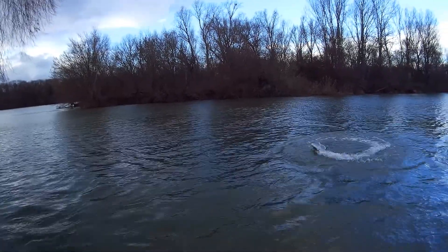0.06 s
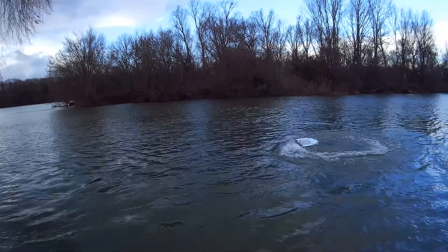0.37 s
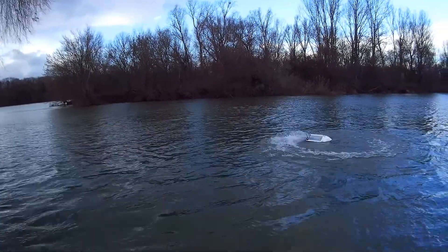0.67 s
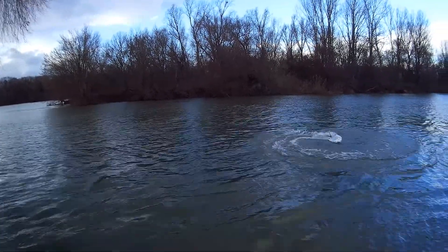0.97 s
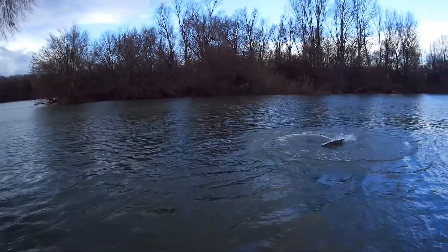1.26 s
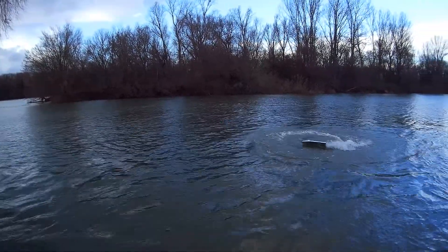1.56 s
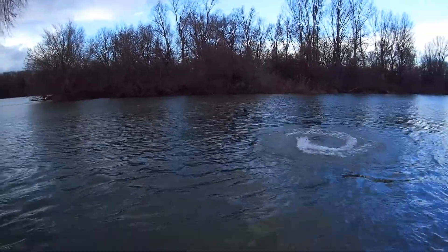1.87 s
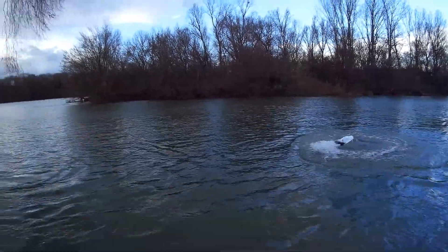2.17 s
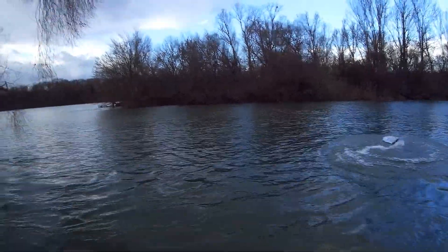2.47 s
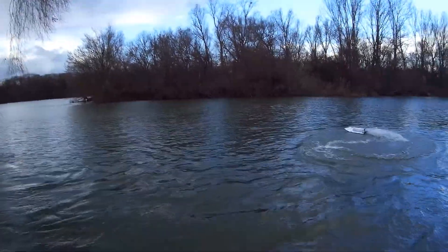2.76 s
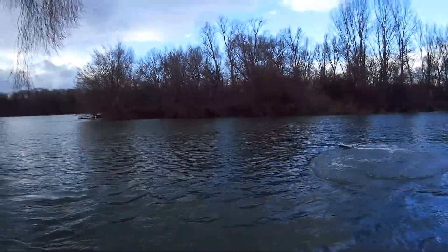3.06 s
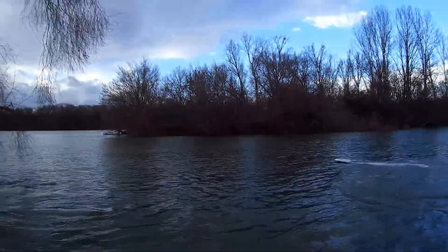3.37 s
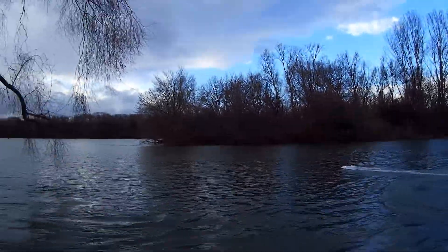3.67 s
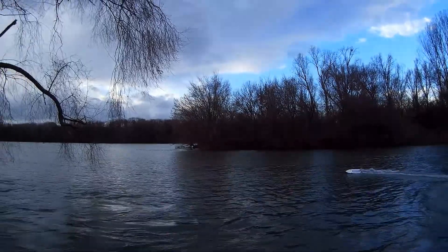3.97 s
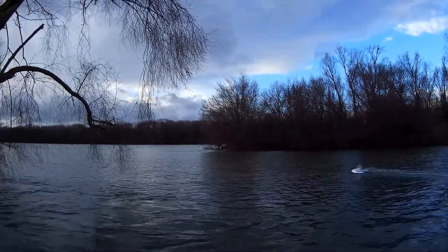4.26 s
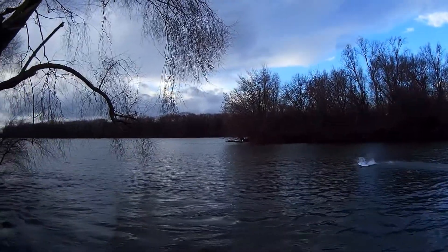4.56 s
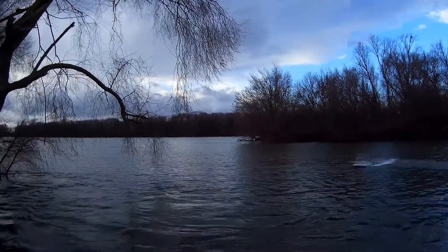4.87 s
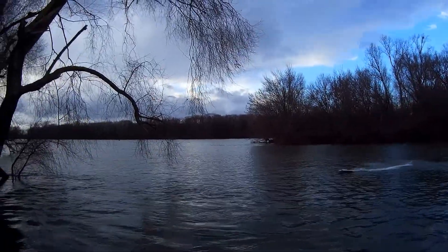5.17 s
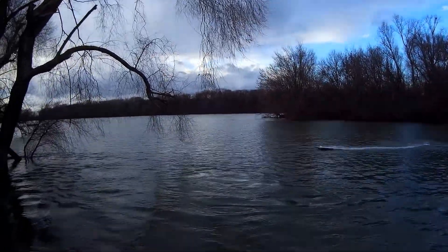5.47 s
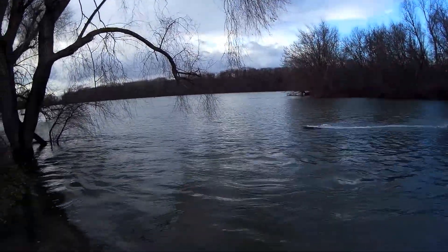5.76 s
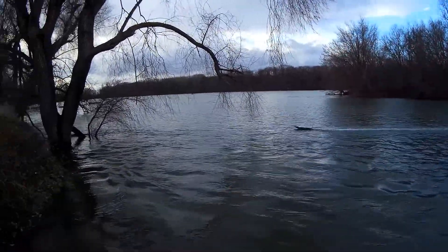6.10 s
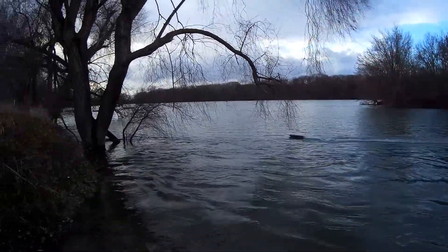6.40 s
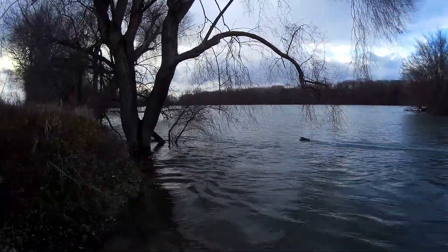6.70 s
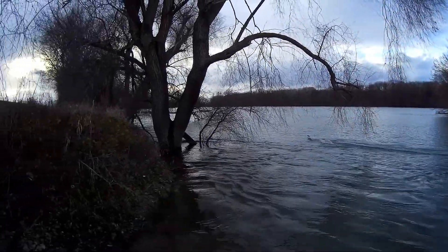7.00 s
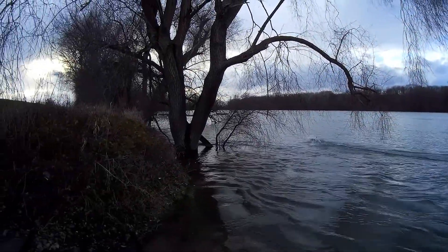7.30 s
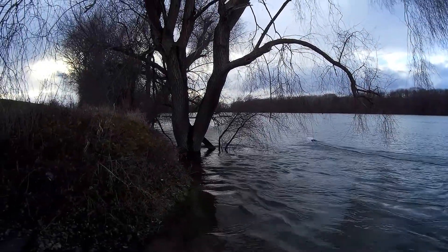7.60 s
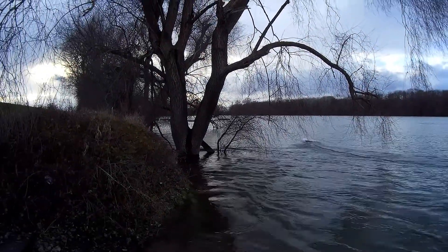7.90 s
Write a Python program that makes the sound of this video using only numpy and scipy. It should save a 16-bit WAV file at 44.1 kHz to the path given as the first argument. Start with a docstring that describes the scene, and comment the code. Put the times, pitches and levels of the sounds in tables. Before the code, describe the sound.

Close, uneven steps jolt the microphone with knocks and small clicks over soft wind, water and a distant model boat's thin whine.

```python
"""On a riverbank, heavy steps shake a body-worn camera: each one thuds and jolts its case into a knock.
Small clicks and rubbing cloth fall between the steps, and a few jolts set a metal part ringing.
Far out on the water a model boat's motor whines thinly while its propeller churns and throws spray.
Under it all lie a faint wash of wind and water and the microphone's hiss."""
import sys
import numpy as np
from scipy import signal
from scipy.fft import rfft, irfft, next_fast_len
from scipy.io import wavfile
from scipy.ndimage import uniform_filter1d

SR = 44100
rng = np.random.default_rng(int(sys.argv[2]) if len(sys.argv) > 2 else 0)


def waveform_to_disk(signal):
    """Save audio, clipped to [-1, 1], as 16-bit WAV at the path in sys.argv[1]."""
    frames = np.transpose(np.atleast_2d(signal))
    scaled = np.clip(frames, -1, 1) * 32767
    samples = np.round(scaled).astype(np.int16)
    wavfile.write(sys.argv[1], SR, samples)


N = 350222
TIME = np.arange(N) / SR

# jolts of the camera's case: start_s, thud_db, knock_db, clack_db, knock_pitch_hz, clack_pitch_hz
JOLTS = [(0.244, -57, -59.5, -73, 410, 1620), (0.292, -71, -56, -58, 438, 1460),
         (0.594, -51, -49.5, -51.5, 463, 1515), (1.816, -50.5, -49, -53.5, 550, 1560),
         (1.857, -60, -50, -57, 533, 1600), (1.89, -54, -36.5, -42.5, 396, 1720),
         (1.961, -23.5, -33, -35.5, 544, 1590), (2.073, -30.5, -17, -25.5, 512, 1770),
         (2.337, -43.5, -50.5, -71, 326, 1430), (2.414, -44.5, -45, -58, 634, 1440),
         (2.602, -41, -38, -49.5, 480, 1540), (2.738, -38, -40, -53, 473, 1170),
         (2.848, -43, -48, -64, 350, 1390), (3.061, -43, -36.5, -46.5, 610, 1250),
         (3.099, -34, -32, -32.5, 392, 1510), (3.122, -30.5, -16, -19.5, 476, 1390),
         (3.163, -52, -32.5, -47, 416, 1600), (3.439, -40, -41, -72, 345, 1430),
         (3.768, -55, -52, -85, 450, 1594), (3.801, -42, -48.5, -62, 524, 1570),
         (4.095, -37, -40, -47.5, 310, 1410), (4.227, -45, -55, -60, 474, 1270),
         (4.421, -32.5, -57, -61.5, 333, 1580), (4.437, -24, -21, -22, 620, 1500),
         (4.59, -39.5, -50, -56, 350, 1760), (4.918, -39.5, -45.5, -65, 313, 1225),
         (5.227, -47.5, -41.5, -46, 610, 1600), (5.466, -40, -65, -79.5, 307, 1420),
         (5.511, -34.5, -45, -58.5, 330, 1480), (5.615, -27.5, -16, -21.5, 444, 1380),
         (6.894, -68.5, -61.5, -57, 662, 1391), (7.1, -64, -66, -58, 493, 1427),
         (7.902, -38, -34, -36.5, 344, 1856)]
# tone of both the boat's mist and the microphone's hiss: pitch_hz, relative_db
HISS_TONE = [(1000, 8), (5000, -1.5), (8000, -3), (14000, -5.5), (15100, -8.5), (16000, -22)]


def case_knocks(jolts, thud_rise_s=0.0034, contact_s=0.0024, rattle_s=0.014, crack_s=0.0015):
    """Each jolt rings the camera's case in four parts, low to high: thud, knock, clack and tick."""
    # the notes the case rings at: pitch_hz, relative_db, ring_s
    case_notes = [(72, 0, 0.15), (104.3, 4.5, 0.15), (142.2, -5, 0.25), (221.5, -7, 0.2),
                  (316.3, -11, 0.042), (344.0, -9.5, 0.073), (400.2, 3.5, 0.021), (444.0, -25.5, 0.16),
                  (506, 6, 0.018), (612, -4, 0.035), (764.7, -7.5, 0.033), (976, -19.5, 0.056),
                  (1086, -6.5, 0.07), (1433, 0.4, 0.037), (1440, -4, 0.019), (1618, -1, 0.026),
                  (1953, 2.5, 0.022), (1875, -29.5, 0.26), (2135, -1.5, 0.02), (2474, -12, 0.02),
                  (2820, -20.5, 0.022), (3190, -23, 0.03), (4065, -26, 0.022), (4670, -37.5, 0.013),
                  (5900, -34.5, 0.014), (6070, -26, 0.015)]
    # the ranges of thud, knock, clack and tick: low_hz, high_hz
    ranges = [(66, 250), (260, 1300), (880, 2540), (2400, 6000)]
    out, t = np.zeros(N), np.arange(SR // 4) / SR
    hz = np.array(case_notes)[:, 0]
    part_of_note = np.searchsorted([250, 1000, 2400], hz)
    blow = np.sqrt(0.03 * SR)  # levels count as if each part lasted 30 ms
    for start_s, thud_db, knock_db, clack_db, knock_hz, clack_hz in jolts:
        tick_db = clack_db - 20.5
        levels_db = thud_db, knock_db, clack_db, tick_db
        notes = np.array(case_notes)
        notes[:, 0] *= 1 + 0.004 * rng.standard_normal(len(hz))
        # where the case is pushed decides which notes stand out
        for centre_hz, boost_db in (knock_hz, 7), (clack_hz, 4):
            notes[:, 1] += boost_db * np.exp(-(np.log2(hz / centre_hz) / 0.25) ** 2)
        ring = fading_notes(notes, t)
        # a heavy step is one clean blow; a light touch chatters
        rattle = np.interp(max(levels_db), [-55, -22], [0.88, 0.16])
        chatter = rng.standard_normal(len(t)) * np.exp(-t / rattle_s)
        push = rattle * chatter / np.linalg.norm(chatter)
        push[0] += 1
        for k, level_db in enumerate(levels_db):
            part = ring[part_of_note == k].sum(0)
            if k == 0:  # soft ground takes the weight too slowly to chatter
                part = part * fade_in(t, thud_rise_s)
            else:  # the plastic closes fast
                part = signal.fftconvolve(part * fade_in(t, contact_s), push)[:len(t)]
            part = band(part, *ranges[k])
            add(out, start_s, part * undb(level_db) * blow / np.linalg.norm(part))
        # a brief crack, stronger on hard blows
        hardness = np.interp(knock_db, [-30, -16], [0.15, 1])
        crack_shape = np.exp(-((t - crack_s) / (crack_s / 2)) ** 2)
        crack = band(rng.standard_normal(len(t)) * crack_shape, *ranges[-1])
        add(out, start_s, crack * hardness * undb(tick_db - 8) * blow / np.linalg.norm(crack))
    return out


def faint_taps(movement, count=22, knock_hz=419, clack_hz=1500):
    """Extra jolts at random times, as strong as the walker's movement at that moment."""
    taps = []
    for when, pitch in rng.random((count, 2)):
        db = 20 * np.log10(movement[int(when * N)])
        taps.append((when * N / SR, db + 6, db + 4, db - 6, knock_hz * 2 ** (pitch - 0.5), clack_hz))
    return taps


def metal_clinks(rise_s=0.0053):
    """A small metal part rings on after the jolts that reach it."""
    # blows on the part: start_s, strength_db
    blows = [(2.738, -47), (2.803, -57), (4.097, -42), (4.437, -19)]
    # the notes it rings at: pitch_hz, relative_db, ring_s
    metal_notes = [(641, 13, 0.031), (917, -7, 0.13), (1091, 3, 0.086), (1540, 10.5, 0.04),
                   (1620, -22, 0.18), (1814, -5, 0.36), (1916, -18, 0.47), (2480, -31.5, .35),
                   (2720, -7.5, 0.073), (3550, -26, 0.16)]
    out, t = np.zeros(N), np.arange(SR // 2) / SR
    ring = fading_notes(metal_notes, t).sum(0) * fade_in(t, rise_s)
    for start_s, strength_db in blows:
        add(out, start_s, undb(strength_db) * ring)
    return out


def catch_clicks(rise_s=0.00091, fade_s=0.006, spread=1.35):
    """The catch on the camera's mount snaps: a bright burst that dies at once."""
    # snaps of the catch: start_s, pitch_hz, level_db
    snaps = [(2.612, 5600, -58), (3.163, 3590, -51), (4.096, 2870, -49), (4.438, 4700, -43),
             (5.227, 2900, -58), (5.617, 4200, -39.5), (7.902, 3300, -44)]
    out, t = np.zeros(N), np.arange(SR // 20) / SR
    shape = fade_in(t, rise_s) * np.exp(-t / fade_s)
    for start_s, pitch_hz, level_db in snaps:
        burst = band(rng.standard_normal(len(t)), pitch_hz / spread, pitch_hz * spread)
        add(out, start_s, burst / burst.std() * undb(level_db) * shape)
    return out


def walker_movement(still_db=-74):
    """How strongly the walker moves: a swell with each shift of weight."""
    # shifts of weight: peak_s, length_s, level_db
    shifts = [(0.7, 0.85, -65), (1.95, 0.17, -49), (2.15, 0.26, -58.5), (2.68, 0.52, -59),
              (3.47, 0.098, -63), (4.14, 0.5, -58), (4.85, 0.56, -67), (5.54, 0.16, -65),
              (6.91, 0.024, -57.5), (7.07, 0.19, -66.5)]
    return np.hypot(undb(still_db), swells(shifts))


def body_rumble(movement, still_db=-62.5, settle_s=0.092, shudder_hz=(68, 131)):
    """The walker's body rumbles as it moves and shudders after each thud."""
    # tone of the rumble: pitch_hz, relative_db
    rumble_tone = [(25, -14.5), (38, -0.5), (52, -11.5), (72, -0.5), (105, -4.5), (180, -15), (330, -15.5),
                   (650, -20), (1000, -30.5)]
    strength = np.hypot(undb(still_db), movement * undb(3))
    rumble = noise(rumble_tone) * strength * undb(3 * wander(7.5))
    power, t = np.zeros(N), np.arange(SR) / SR
    for start_s, thud_db, *_ in JOLTS:
        add(power, start_s, (undb(thud_db - 13) * np.exp(-t / settle_s)) ** 2)
    shudder = band(rng.standard_normal(N), *shudder_hz)
    return rumble + shudder / shudder.std() * np.sqrt(power)


def cloth_rub(movement, flicker_db=4):
    """Clothing catches and slips on the mount as the walker moves."""
    # tone of the rubbing: pitch_hz, relative_db
    rub_tone = [(200, -9), (500, -5.5), (850, -4.5), (1080, 1), (1220, -6.5), (1450, 2), (1650, -7),
                (1950, 3), (2250, -10.5), (2550, -34), (3000, -13.5), (6000, -29)]
    return noise(rub_tone) * movement * undb(flicker_db * wander(45))


def brushes_and_rings(spread=1.1):
    """Cloth brushes on the mount, and the camera's case rings briefly near 670 Hz after two jolts."""
    # cloth brushes and the two low rings of the case: peak_s, length_s, pitch_hz, level_db
    bursts = [(1.924, 0.093, 1880, -54), (2.054, 0.21, 5550, -61.5), (2.416, 0.0093, 696, -40),
              (2.466, 0.047, 1870, -53.5), (3.064, 0.017, 650, -36), (4.835, 0.029, 1836, -57),
              (7.102, 0.033, 3987, -64.5)]
    out = np.zeros(N)
    for peak_s, length_s, pitch_hz, level_db in bursts:
        t = np.arange(-2 * length_s, 2 * length_s, 1 / SR)
        burst = band(rng.standard_normal(len(t)), pitch_hz / spread, pitch_hz * spread)
        shape = np.exp(-(2 * t / length_s) ** 2)
        add(out, peak_s + t[0], burst / burst.std() * undb(level_db) * shape)
    return out


def model_boat(steer_s=0.16):
    """In tight turns the propeller draws air, so the motor speeds up and the water churns louder."""
    # tight turns: start_s, end_s, extra_churn_db
    turns = [(-0.3, 2.9, 6.5), (4.08, 4.4, 14), (6.898, 8.3, 11)]
    turning, churn_db = np.zeros(N), np.zeros(N)
    for start_s, end_s, extra_churn_db in turns:
        inside_s = np.minimum(TIME - start_s, end_s - TIME)
        turn = np.clip(inside_s / steer_s + 0.5, 0, 1)
        turning += turn
        churn_db += turn * extra_churn_db
    return motor_whine(turning) + boat_wake(churn_db)


def motor_whine(turning, straight_hz=438, turning_hz=459, wobble=0.0077):
    """The motor sings at two and three times its spin rate, wavering with the waves."""
    # loudness as the boat's heading and distance change: time_s, relative_db
    loudness = [(0, -73), (2.6, -77), (3.4, -71.5), (5.3, -64), (6.7, -71.5), (7.3, -74.5), (7.8, -64.5)]
    spin_hz = straight_hz + (turning_hz - straight_hz) * turning
    angle = 2 * np.pi * np.cumsum(spin_hz * (1 + wobble * wander(44))) / SR
    lower = undb(-4 + 3.5 * wander(14)) * np.sin(2 * angle)
    upper = undb(-2 + 3.5 * wander(12)) * np.sin(3 * angle)
    return (lower + upper) * undb(curve(loudness))


def boat_wake(churn_db):
    """The propeller churns the water, the hull splashes, and the wake throws spray and fine mist."""
    # loudness of the wake: time_s, relative_db
    loudness = [(0.0, -70), (0.6, -70), (0.79, -69.5), (1.17, -75), (1.46, -72.5), (1.88, -69.5),
                (2.03, -63.5), (3.65, -70.5), (4.58, -65.5), (4.75, -71.5), (5.2, -73.5), (5.57, -66.5),
                (5.82, -71), (6.92, -73), (7.41, -77.5), (7.94, -84)]
    # splashes from the hull: peak_s, length_s, level_db
    splashes = [(0.63, 0.15, -61.5), (0.88, 0.43, -63), (2.8, 0.12, -56), (4.65, 0.14, -66.5),
                (5.76, 0.1, -66)]
    # tone of the churning: pitch_hz, relative_db
    churn_tone = [(900, -33.5), (1230, -25), (1330, -4), (1395, 5.5), (1470, -7), (1650, -19.5),
                  (2300, -44.5)]
    # tone of the spray: pitch_hz, relative_db
    spray_tone = [(1800, -27), (2450, -3.5), (2950, -18.5), (3350, 4), (3700, -15.5), (4150, 0), (4450, -6),
                  (4800, -17.5), (6000, -20.5), (8000, -50)]
    wake = undb(curve(loudness) + 2)
    thrown = np.hypot(wake, swells(splashes))  # all the water in the air
    churn = noise(churn_tone) * np.sqrt(wake * thrown) * undb(churn_db - 1.5 + 2.5 * wander(30))
    spray = noise(spray_tone) * thrown * undb(1.2 * wander(22))
    mist = noise(HISS_TONE) * wake * undb(-3 + 2.2 * wander(9))
    return churn + spray + mist


def river(level_db=-58.5):
    """A low wash of wind and water, swelling gently."""
    # tone of the wash: pitch_hz, relative_db
    wash_tone = [(20, -0.5), (37, 9), (52, -5), (70, -9), (120, -9.5), (250, -11.5), (500, -20), (800, -20),
                 (1080, -19), (1200, -26.5), (2500, -29), (3000, -31.5), (6000, -47.5)]
    return noise(wash_tone) * undb(level_db + 0.96 * wander(2) + 0.72 * wander(15))


def microphone_hiss(level_db=-73):
    """The microphone's own steady hiss."""
    return noise(HISS_TONE) * undb(level_db)


def undb(db):
    """Turn decibels into a number to multiply by."""
    return 10 ** (np.asarray(db) / 20)


def curve(points):
    """Join (time, value) points with straight lines."""
    return np.interp(TIME, *np.transpose(points))


def swells(rows):
    """Combine bell-shaped rises and falls into one loudness curve."""
    return np.sqrt(sum(undb(level_db) ** 2 * np.exp(-(2 * (TIME - peak_s) / length_s) ** 2)
                       for peak_s, length_s, level_db in rows))


def fade_in(t, rise_s):
    """A smooth rise from 0 to 1."""
    return np.sin(np.pi / 2 * np.minimum(t / rise_s, 1)) ** 2


def fading_notes(notes, t):
    """One pure tone for each note, falling by 60 dB over its ring_s."""
    pitch_hz, level_db, ring_s = np.transpose(notes)[:, :, None]
    return undb(level_db) * np.exp(-np.log(1000) * t / ring_s) * np.sin(2 * np.pi * pitch_hz * t)


def wander(rate_hz):
    """A smooth random drift of typical size 1, changing about rate_hz times a second."""
    width = max(int(SR / rate_hz), 2)
    drift = rng.standard_normal(N)
    for _ in range(2):
        drift = uniform_filter1d(drift, width, mode="wrap")
    return drift / drift.std()


def noise(tone):
    """Noise of typical size 1, shaped by a tone table and falling away beyond its ends."""
    hz, db = np.transpose(tone)
    size = next_fast_len(N)
    all_hz = np.maximum(np.arange(size // 2 + 1) * SR / size, 1)
    gain = undb(np.interp(np.log(all_hz), np.log(hz), db))
    gain *= np.minimum(np.minimum(all_hz / hz[0], hz[-1] / all_hz), 1) ** 2
    sound = irfft(rfft(rng.standard_normal(size)) * gain, size)[:N]
    return sound / sound.std()


def band(sound, low_hz, high_hz):
    """Keep the part of a sound between two pitches."""
    return signal.sosfilt(signal.butter(3, [low_hz, high_hz], "band", fs=SR, output="sos"), sound)


def add(out, start_s, sound):
    """Mix a sound in at a given time."""
    i = max(int(start_s * SR), 0)
    out[i:i + len(sound)] += sound[:max(N - i, 0)]


def scene():
    """Steps close by, boat and river far off, the microphone's hiss under all."""
    movement = walker_movement()
    camera = case_knocks(JOLTS + faint_taps(movement)) + catch_clicks() + metal_clinks()
    close_by = camera + body_rumble(movement) + cloth_rub(movement) + brushes_and_rings()
    return (close_by + model_boat() + river() + microphone_hiss())[None]


def record(dry):
    """The camera rounds off the loudest peaks and cuts the highest treble."""
    rounded = dry / (1 + dry ** 8) ** (1 / 8)
    treble_cut = signal.ellip(10, 0.2, 70, 15700, fs=SR, output="sos")
    return signal.sosfilt(treble_cut, rounded)


dry = scene()
out = record(dry)
waveform_to_disk(out)
```